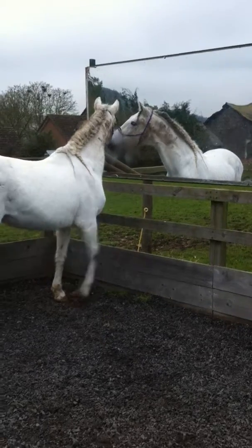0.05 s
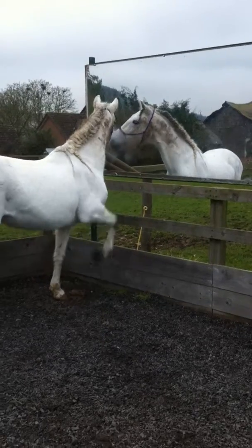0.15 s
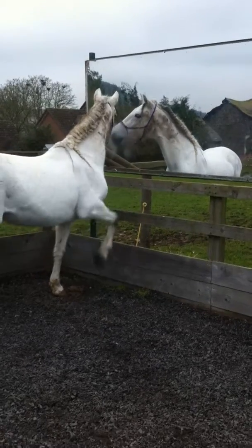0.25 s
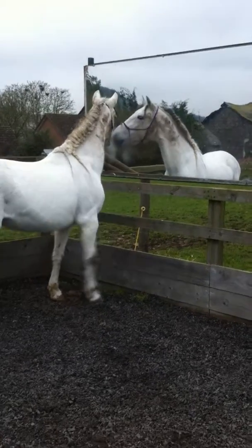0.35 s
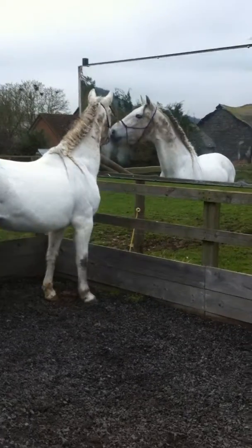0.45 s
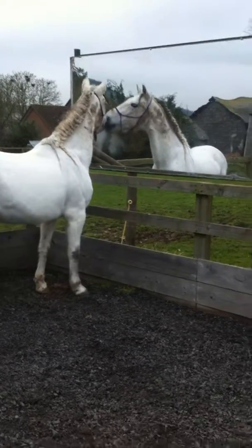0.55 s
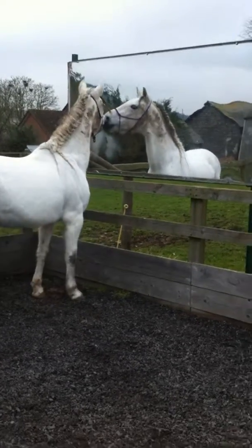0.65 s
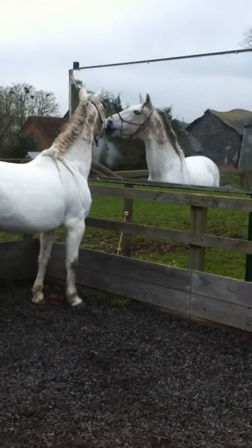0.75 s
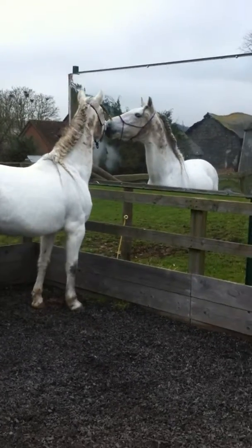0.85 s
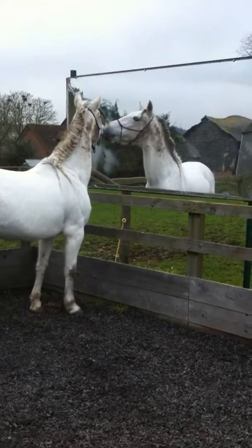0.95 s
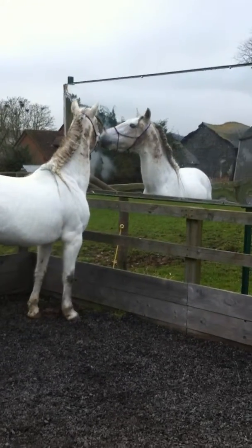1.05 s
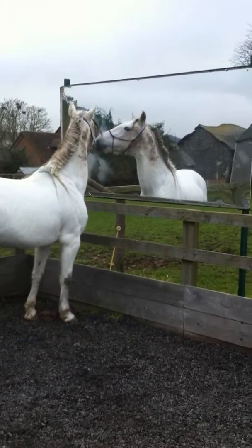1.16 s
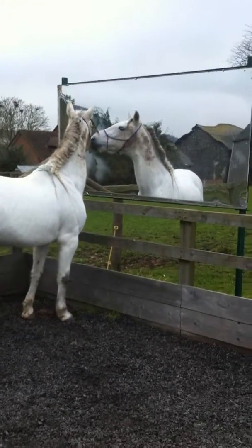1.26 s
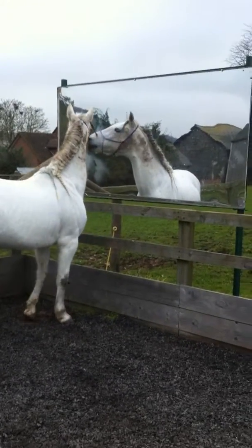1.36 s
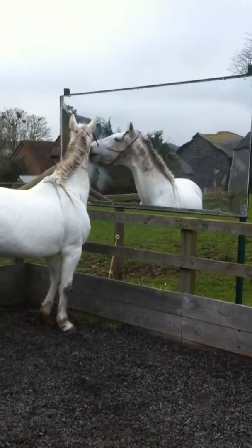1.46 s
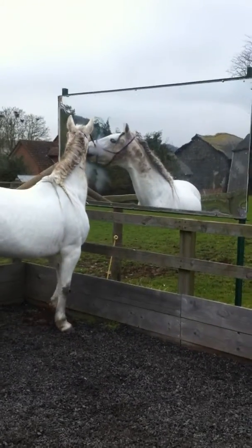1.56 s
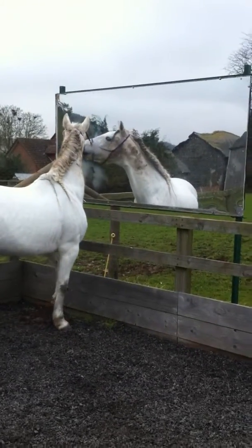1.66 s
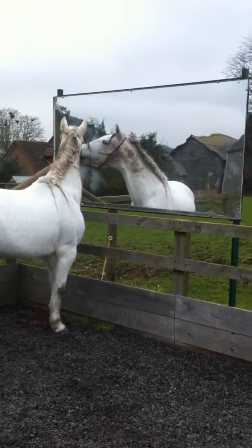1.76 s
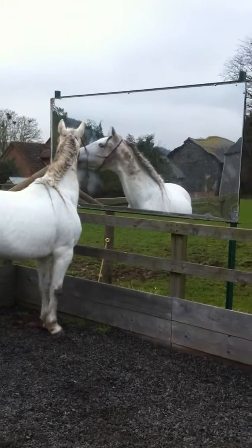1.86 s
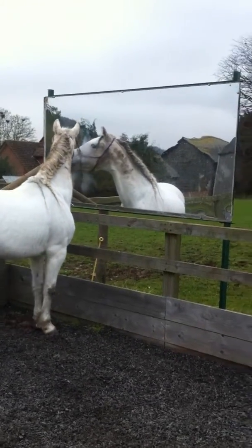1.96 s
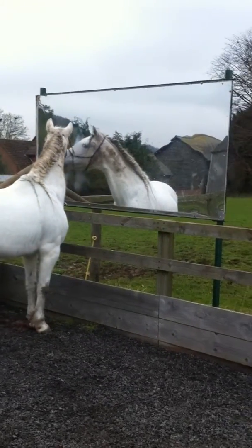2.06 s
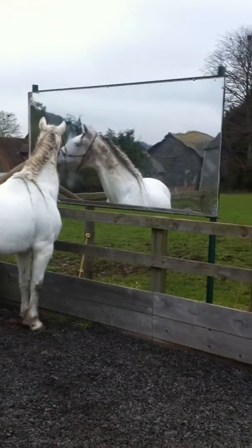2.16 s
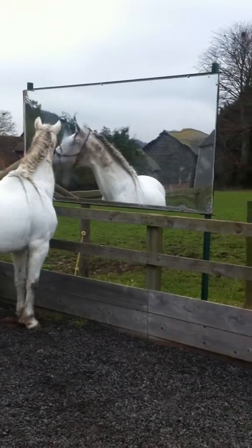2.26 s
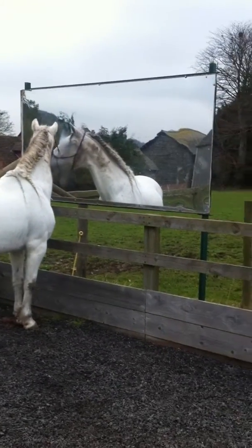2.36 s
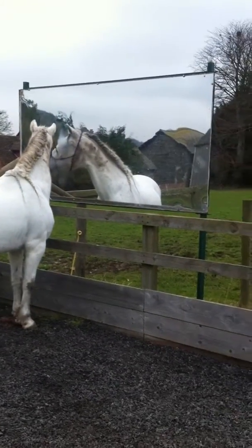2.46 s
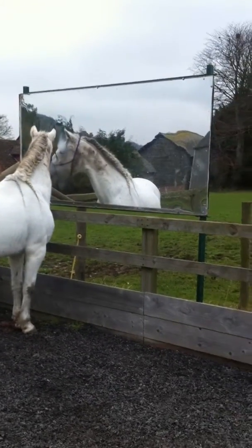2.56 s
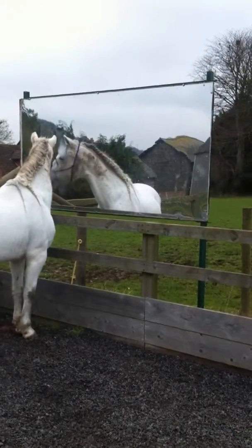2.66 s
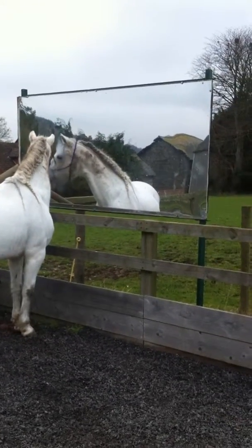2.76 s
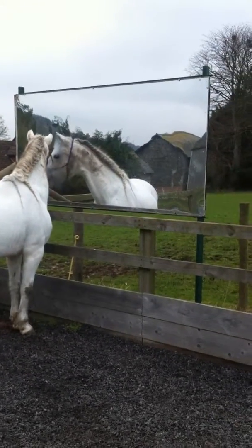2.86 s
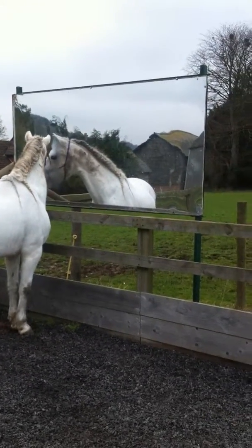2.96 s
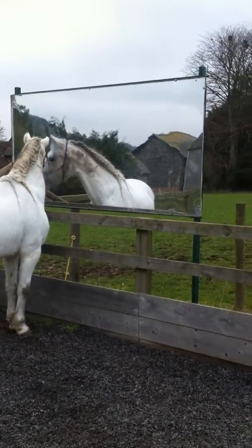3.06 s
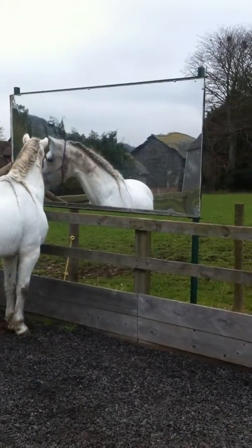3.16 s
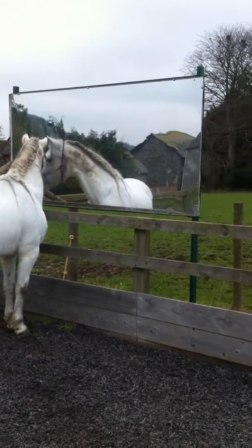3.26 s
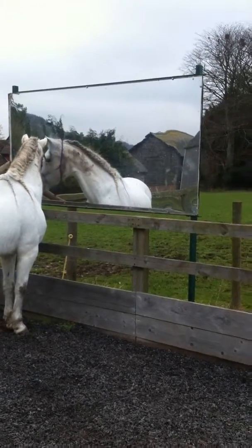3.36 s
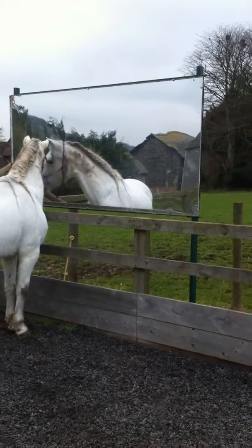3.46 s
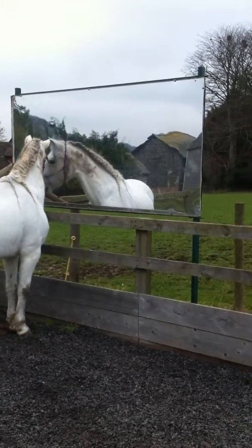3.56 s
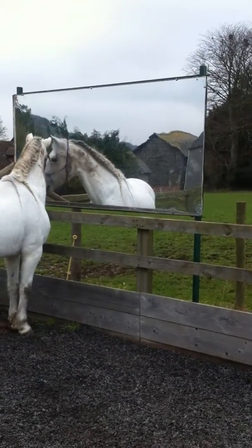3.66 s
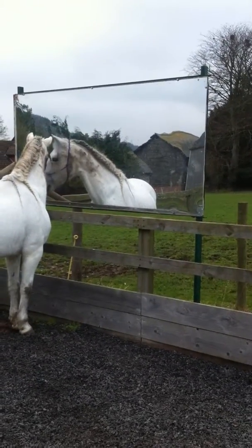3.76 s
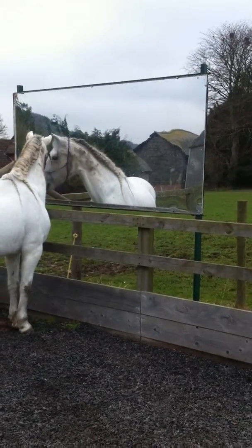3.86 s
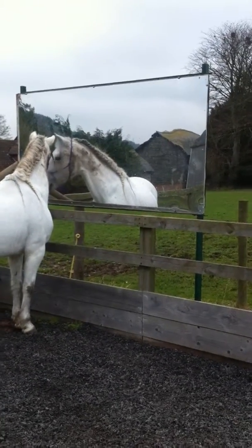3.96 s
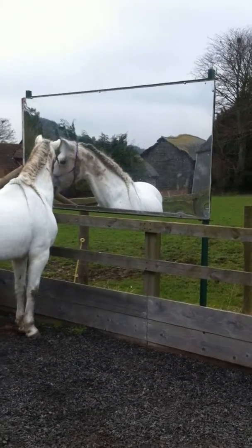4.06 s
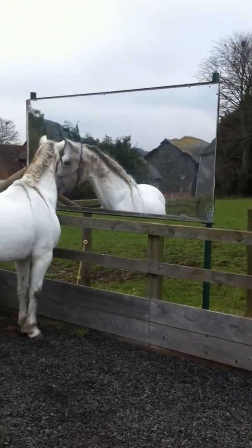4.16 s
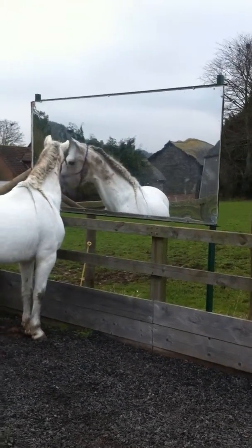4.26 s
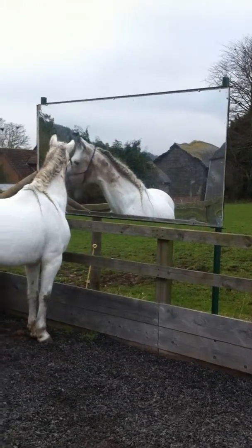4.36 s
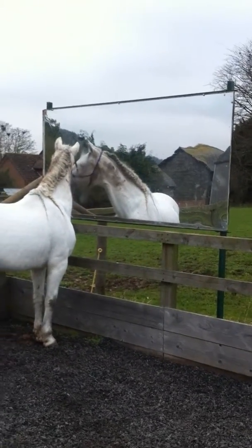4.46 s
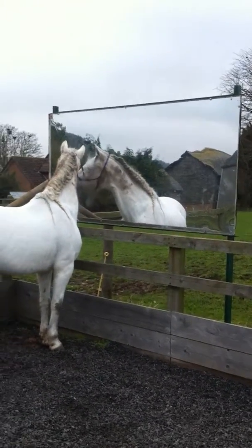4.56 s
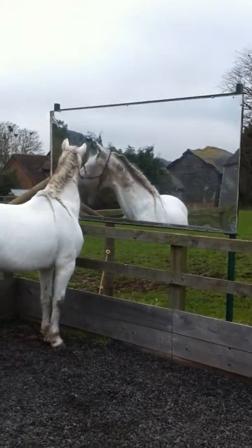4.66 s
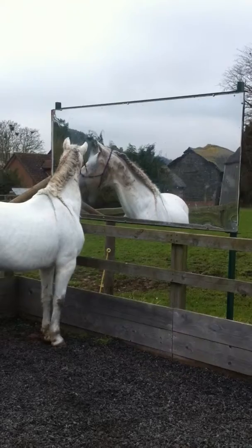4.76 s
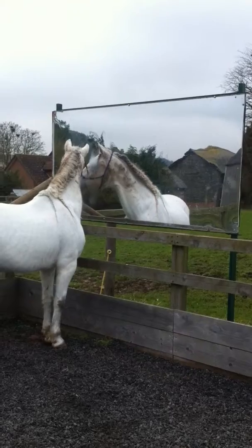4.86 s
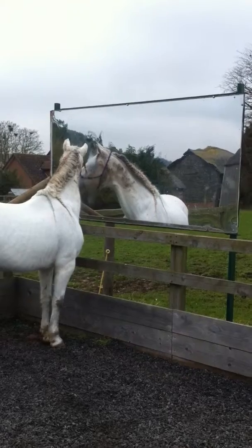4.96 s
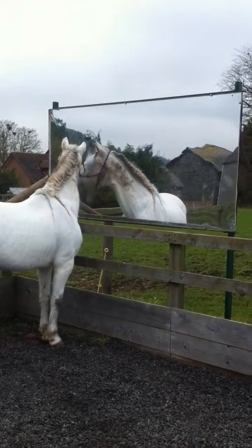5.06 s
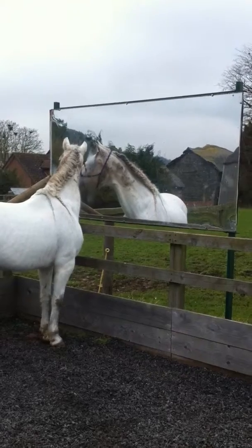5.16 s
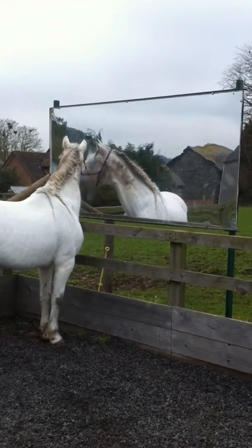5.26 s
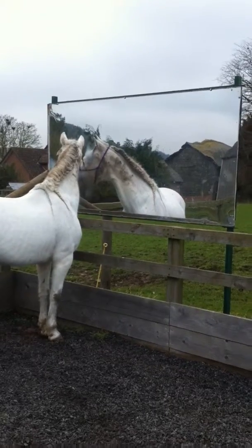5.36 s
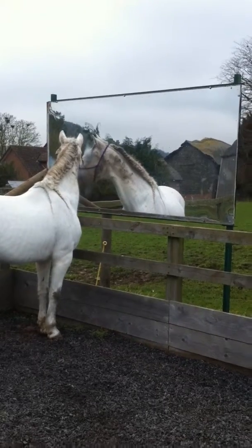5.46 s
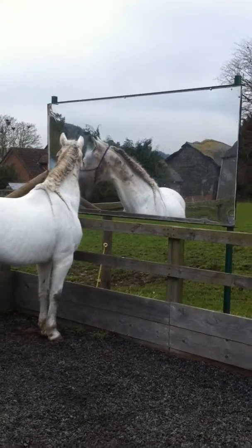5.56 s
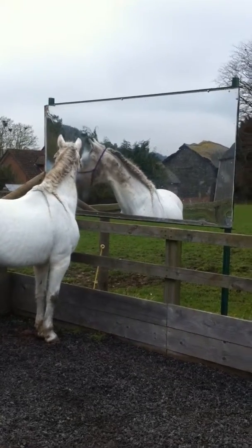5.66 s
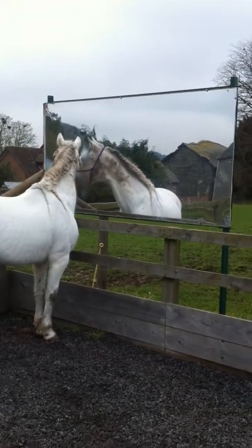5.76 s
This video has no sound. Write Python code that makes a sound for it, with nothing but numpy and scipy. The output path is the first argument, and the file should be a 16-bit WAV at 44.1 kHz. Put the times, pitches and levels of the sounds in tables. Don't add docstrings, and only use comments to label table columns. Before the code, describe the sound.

Faint road hum and soft hiss open with a distant bird wheeze. A horse's shrill squeal leaps up, holds, cracks into a raspy flutter around a hoof stamp, and drops into a short grunt, all within the first second. Light reflections return from sheds and a far barn. The remainder is quiet: tiny twig ticks, thin sliding bird chirps and buzzy wheezes, heard by a handheld microphone outdoors.

```python
import sys
import numpy as np
from scipy import signal
from scipy.fft import rfft, irfft, next_fast_len
from scipy.io import wavfile
from scipy.ndimage import uniform_filter1d, map_coordinates

SR = 44100
rng = np.random.default_rng(int(sys.argv[2]) if len(sys.argv) > 2 else 0)


def makeup_ratio(level_db):
    decades = np.asarray(level_db, float) / 20
    return 10 ** decades


def waveform_to_disk(signal):
    frames = np.transpose(np.atleast_2d(signal))
    scaled = np.clip(frames, -1, 1) * 32767
    samples = np.round(scaled).astype(np.int16)
    wavfile.write(sys.argv[1], SR, samples)


N = 256220
T = np.arange(N) / SR

# start_s, level_db
ROAD_SWELLS = [(1.25, -63), (2.15, -65), (3.09, -65.5), (3.71, -63), (4.11, -63.5), (4.54, -63),
               (4.65, -63.5), (5.01, -64), (5.45, -62.5), (5.81, -64)]
# freq_hz, density_db
ROAD_COLOUR = [(25, -16), (60, -19), (90, -12), (118, -2.5), (208, -1), (283, -8), (620, -2), (3200, -23.5)]
# freq_hz, density_db
HISS_COLOUR = [(1470, -29), (2500, -7.5), (3200, -6), (3730, -6), (14400, -10.5), (15700, -8)]
# start_s, pulse_rate_hz, beak_centre_hz, level_db
WHEEZES = [
    [(0, 445, 3220, -85.5), (.06, 444, 3170, -70), (.12, 445, 3000, -77)],
    [(1.565, 300, 5200, -88), (1.585, 310, 5500, -71), (1.6, 320, 5800, -80)],
    [(1.83, 448, 4300, -84), (1.92, 450, 4040, -77), (2.1, 438, 3700, -72), (2.2, 425, 3440, -72.5),
     (2.31, 409, 3050, -74), (2.38, 391.3, 3050, -78)],
    [(5.52, 443.7, 3990, -97), (5.62, 435, 3920, -76), (5.81, 428, 3800, -73)],
]
# start_s, length_s, from_hz, to_hz, level_db
CHIRPS = [(2.802, 0.022, 3200, 2530, -78), (2.856, 0.03, 3600, 2600, -69),
          (2.949, 0.037, 3650, 2790, -68.5), (3.057, 0.036, 3350, 2720, -67), (3.17, 0.03, 3550, 2800, -68),
          (3.27, 0.035, 3600, 2820, -68), (3.679, 0.019, 3900, 3040, -71.5), (3.763, 0.02, 3900, 2980, -70),
          (3.866, 0.03, 4000, 2990, -69.5), (4.523, 0.025, 4100, 3060, -69), (4.599, .022, 4000, 3120, -69),
          (4.694, 0.02, 3700, 2920, -73.5), (4.799, 0.016, 3900, 3100, -71.5),
          (1.474, 0.084, 4480, 4463, -71), (1.57, 0.083, 4400, 4600, -74.5),
          (1.693, 0.018, 6400, 5500, -72.5), (1.702, 0.076, 5550, 5100, -74),
          (2.325, 0.093, 2600, 1690, -73), (2.327, 0.036, 1720, 1450, -71), (5.44, 0.069, 5900, 5630, -78)]

# start_s, whistle_pitch_hz, effort_db, brightness_db, low_voice_pitch_hz
SQUEAL_PHRASES = [
    [(.113, 575, -75, -33, 189), (.126, 612.7, -53.5, -39, 192.3), (.172, 907, -43.5, -22, 187.5),
     (.204, 1084, -42, -8.5, 195.4), (.232, 1171, -39.5, -13.5, 229.9), (.276, 1199, -42, -1, 217.2),
     (.36, 1215, -43, -1, 204.3), (.4, 1214, -42, -0.5, 174.1), (.52, 1196, -40.5, -9, 179.2)],
    [(.56, 1150, -43.5, -18, 174.8), (.62, 1160, -45.5, -19.5, 228.6), (.7, 1131, -43.5, -32.5, 222),
     (.78, 1112, -47, -13.5, 198.9), (.826, 924.6, -45, -12, 201.4), (.87, 891, -48, -13.5, 201.7),
     (.89, 776.3, -49, -8.5, 189.7), (.92, 510.5, -52.5, -39, 180), (.96, 420.7, -81.5, -21, 173)],
]
# centre_hz, width_hz, level_db (per pass)
MOUTH_PEAKS = [(210, 140, -29), (513, 273, -3), (844, 540, -2.5), (1450, 213, 3.5), (1975, 330, 3),
               (3320, 1040, 0), (4400, 880, -11), (5340, 440, -17), (8200, 4600, -46)]
# centre_hz, width_hz
MOUTH_POUCHES = [(2650, 160), (5970, 280), (4230, 220), (974, 64)]
# freq_hz, level_db
LIP_COLOUR = [(600, 7), (900, 3), (1060, -5.5), (1250, 0), (2150, 6.5), (2650, -20.5), (3550, -0.5),
              (4800, 3)]
# freq_hz, level_db
OVERTONE_SHEEN = [(5000, 4.5), (6000, 1.5), (6450, -2), (7200, -4), (9600, -0.5), (11500, -10.5),
                  (13000, -9.5), (15700, -23)]
# start_s, sideband_1_db, sideband_2_db, sideband_3_db, rasp_db
COUPLING_STAGES = [(0.101, -24, -27, -26, -6), (.19, -18, 1, -15, -4), (.375, 1.5, -5, 3, -5.5),
                   (.47, -15, -6.5, -9.5, -2), (.58, -6.5, 2.5, -5, -1), (0.809, -6, -8, -24, 2.5)]
# start_s, swell_db
HEAVES = [(0.546, 1.5), (.572, -0.5), (0.592, 5.5), (0.622, 3.5), (.652, 8), (.668, 6.5), (0.696, 5),
          (.71, 8.5), (0.733, 7.5), (.758, 5), (0.78, 3.5), (0.801, 4), (0.825, 2.5)]
BRIGHT_SHARE = (.02, .05, .6, .9)
# crack_s, fall_s
REGISTER_TIMES = (.535, 0.83)
CLEAR_DB = (-1, -7.5, 1.5, -8.5)
CRACKED_DB = (-22, 1, 12, -0.5)
FALLING_DB = (-3, -2, 8.5, 14)
COUPLING_DB = (2, -1.05, -2, -6.5, -4)
NARROWED_DB = (-28, 5.5, -2.5, 4.5, -7.5)
# start_s, pitch_hz, level_db
GRUNT = [(.88, 514, -64), (.905, 430, -47), (.93, 277, -55), (.97, 250, -58.5), (1.0, 235.7, -78),
         (1.02, 222.5, -83)]

# freq_hz, t60_s
YARD_DECAY = [(200, 0.36), (2000, 0.61), (4000, 0.32), (10000, 0.64)]
# start_s, level_db, pitch_hz, t60_s
HOOF_KNOCKS = [
    (0.496, -33.5, 1052, 0.073),
    (0.506, -34, 1360, 0.11),
    (0.52, -35.5, 202.3, 0.14),
    (0.529, -38, 133, 0.1),
]
# start_s, peak_db
TWIG_TICKS = [(1.595, -60), (1.632, -58), (1.985, -59)]


def unit(x):
    return x / np.sqrt(np.mean(np.abs(x) ** 2) + 1e-20)


def along(points, hz):
    f, v = np.transpose(points)
    return np.interp(np.log(hz + 1), np.log(f + 1), v)


def curves(rows):
    s, *cols = np.transpose(rows)
    gate = (T >= s[0]) & (T <= s[-1])
    return [np.interp(T, s, c) for c in cols] + [gate]


def ramp(start_s, length_s):
    return np.clip((T - start_s) / length_s, 0, 1)


def ramp_down(end_s, length_s):
    return np.clip((end_s - T) / length_s, 0, 1)


def wobble(rate):
    coarse = T[::8]
    knots = rng.standard_normal(int(N * rate / SR) + 4)
    return np.interp(T, coarse, map_coordinates(knots, [coarse * rate]))


def turns(hz):
    return 2 * np.pi * np.cumsum(hz) / SR


def filtered(x, response):
    m = next_fast_len(N + SR // 2)
    return irfft(rfft(x, m) * response(np.fft.rfftfreq(m, 1 / SR)), m)[:N]


def background():
    z = signal.stft(rng.standard_normal(N + 512), nperseg=512)[2]
    patches = uniform_filter1d(rng.standard_normal(z.shape), 4, 0)
    patches = uniform_filter1d(patches, 12, 1)
    air = signal.istft(z * makeup_ratio(2 * unit(patches)), nperseg=512)[1][:N]
    hum = unit(filtered(air, lambda f: makeup_ratio(along(ROAD_COLOUR, f)) / (1 + (f / 3000) ** 4)))
    hiss = unit(filtered(rng.standard_normal(N), lambda f: makeup_ratio(along(HISS_COLOUR, f))))
    hum_db = curves(ROAD_SWELLS)[0] + 0.5 + 0.21 * wobble(6.6)
    hiss_db = -70 + 0.54 * wobble(18)
    return makeup_ratio(hum_db) * hum + makeup_ratio(hiss_db) * hiss


def birds():
    rate_hz, beak_hz, wheeze_db, _ = curves(np.vstack(WHEEZES))
    singing = sum((T >= rows[0][0]) & (T <= rows[-1][0]) for rows in WHEEZES)
    phase = turns(rate_hz * (1 + 0.0043 * wobble(40)))
    buzz = 0
    for k in range(5, 20):
        beak = np.exp(-((k * rate_hz - beak_hz) / 700) ** 2)
        buzz = buzz + beak * makeup_ratio(2.3 * wobble(90)) * np.sin(k * phase + 1.44 * wobble(250))

    chirps = np.zeros(N)
    flutter_db, quiver = 2.1 * wobble(90), 0.5 * wobble(180)
    for s, length, from_hz, to_hz, db in CHIRPS:
        u = ramp(s, length)
        swell = np.sin(np.pi * u ** 0.5) ** 0.52
        slide = turns(from_hz + (to_hz - from_hz) * u)
        chirps += makeup_ratio(db + 3 + flutter_db) * swell * np.sin(slide + quiver)
    return chirps + singing * makeup_ratio(wheeze_db) * buzz


def mouth(f):
    peaks = sum(makeup_ratio(db) * 1j * f * w / (c * c - f * f + 1j * f * w) for c, w, db in MOUTH_PEAKS) ** 2
    notches = np.prod([(c * c - f * f) / (c * c - f * f + 1j * f * w) for c, w in MOUTH_POUCHES], axis=0)
    return peaks * notches * (1j * f / (250 + 1j * f)) ** 2


def grunt():
    hz, db, gate = curves(GRUNT)
    tone = np.sin(turns(hz * (1 + 0.0508 * wobble(80.77))))
    return gate * makeup_ratio(db - 0.5 + 2.77 * wobble(57.4)) * tone


def squeal():
    hz, effort_db, bright_db, low_hz, gate = curves(np.vstack(SQUEAL_PHRASES))
    stages = np.array(COUPLING_STAGES)
    index = np.clip(np.searchsorted(stages[:, 0], T) - 1, 0, None)
    blended = uniform_filter1d(stages[index, 1:].T, round(0.035 * SR), axis=1)
    *side_db, coarse_db = effort_db + blended
    rasp_db = coarse_db + 0.61 * bright_db
    overtone_db = effort_db - 4 + bright_db

    crack_s, fall_s = REGISTER_TIMES
    falling = ramp(fall_s, 0.034)
    cracked = ramp(crack_s, 0.032) - falling
    hoarse = ramp(0.47, 0.058)
    heaving = hoarse * ramp_down(0.86, 0.17)
    closing = hoarse * ramp_down(0.8, 0.014)
    heaves_db = sum(db * np.exp(-((T - s) / 0.0068) ** 2) for s, db in HEAVES)
    throb_db = (0.4 + 0.43 * hoarse) * wobble(44.17) - 3 * heaving + heaves_db
    high = turns(hz * (1 + (0.0017 + 0.0023 * hoarse) * wobble(70.17)))

    lines = 0
    strengths = zip(BRIGHT_SHARE, CLEAR_DB, CRACKED_DB, FALLING_DB)
    for k, (share, clear, crack, fall) in enumerate(strengths, 1):
        register_db = clear + (crack - clear) * cracked + (fall - clear) * falling
        line_db = effort_db + along(LIP_COLOUR, k * hz) + share * bright_db + register_db
        line_db = line_db + 5 + throb_db + (1.2 + 0.61 * closing) * wobble(59.7)
        jitter = (1.4 * closing + 1.4 * falling * (k == 1)) * wobble(110)
        lines = lines + makeup_ratio(line_db) * np.sin(k * high + jitter)

    comb = 0
    for k, (db, change_db) in enumerate(zip(COUPLING_DB, NARROWED_DB)):
        comb = comb + makeup_ratio(db + change_db * closing) * np.exp(1j * ((k + 1) * high + k * k * np.pi / 5))
    sides = 0
    for m, db in enumerate(side_db, 1):
        unsteady_hz = low_hz * (1 + (0.01247 + 0.031 * closing) * wobble(25.15))
        low = m * turns(unsteady_hz) + (0.38 + 0.5 * closing) * wobble(59.94)
        sides = sides + makeup_ratio(db - 7.5 + throb_db + 4.1 * wobble(39.15)) * np.real(comb * np.exp(-1j * low))

    beat = np.exp(-1j * turns(2 * low_hz))
    chaos = (wobble(700) + 1j * wobble(700)) * beat
    rasp = makeup_ratio(rasp_db - 2.5 + throb_db) * np.real(comb * chaos)
    breath = makeup_ratio(rasp_db + 5 + 7 * closing + throb_db) * rng.standard_normal(N)

    hum_db = effort_db - 8.5 + throb_db + 5.1 * wobble(30.3) - 11 * ramp(0.72, 0.026)
    hum_share = 0.64 * ramp(0.3, 0.078) + 0.38 * cracked
    hum_hz = (1.9 + 0.18 * hoarse) * low_hz * (1 + 0.0411 * wobble(18))
    hum = makeup_ratio(hum_db) * hum_share * np.sin(turns(hum_hz) + 0.9 * wobble(90))

    overtones = 0
    for k in range(5, 17):
        level = makeup_ratio(2.6 * wobble(29) - 5)
        steady = makeup_ratio(3.5 * wobble(25) - 3) * np.exp(0.85j * wobble(150))
        beating = 0.5 * makeup_ratio(4 * wobble(12.7)) * np.exp(0.8j * wobble(120))
        noisy = (0.5 - 0.25 * falling) * wobble(900)
        shake = steady + beat * (beating + noisy)
        overtones = overtones + level * shake * np.exp(1j * k * high) * (k * hz < 15700)
    sheen = filtered(np.real(overtones), lambda f: makeup_ratio(along(OVERTONE_SHEEN, f)))

    whistle = gate * (lines + makeup_ratio(overtone_db) * sheen)
    voiced = filtered(gate * (sides + rasp + breath + hum), mouth)
    return whistle + voiced + grunt()


def yard(x):
    hz, t, z = signal.stft(rng.standard_normal(SR), SR, nperseg=256)
    decay = makeup_ratio(-60 * t / along(YARD_DECAY, hz)[:, None])
    tail = signal.istft(z * decay, SR, nperseg=256)[1]
    wet = signal.fftconvolve(np.pad(x, (600, 0)), tail / np.linalg.norm(tail))[:N]
    smear = rng.standard_normal(4000) * makeup_ratio(-55 * np.arange(4000) / 4000)
    late = np.pad(x, (round(0.295 * SR), 0))
    barn = signal.fftconvolve(late, smear / np.linalg.norm(smear))[:N]
    dull_barn = filtered(barn, lambda f: 1 / (1 + (f / 3200) ** 2))
    return makeup_ratio(-13.5) * wet + makeup_ratio(-21.5) * dull_barn


def stamp():
    out = np.zeros(N)
    for s, db, hz, t60 in HOOF_KNOCKS:
        t = np.clip(T - s, 0, None)
        rise = 1 - np.exp(-(t / 0.006) ** 2)
        knock = np.sin(2 * np.pi * hz * t + wobble(61.1))
        out += makeup_ratio(db - 60 * t / t60 + 3.6 * wobble(76.85)) * rise * knock
    grit = filtered(rng.standard_normal(N), lambda f: f * f / (f * f + 150 ** 2) / (1 + (f / 350) ** 4))
    return out + makeup_ratio(-38 - 60 * t / 0.09) * rise * unit(grit)


def twigs():
    size = np.zeros(N)
    for s, db in TWIG_TICKS:
        t = np.clip(T - s, 0, None)
        size += makeup_ratio(db - 60 * t / 0.02) * (t > 0)
    return size * filtered(rng.standard_normal(N), lambda f: f * f / (f * f + 4000 ** 2))


def scene():
    near = squeal() + stamp() + birds()
    return (near + yard(near) + twigs() + background())[None]


def low_pass(x):
    return signal.sosfilt(signal.butter(12, 15800, fs=SR, output="sos"), x)


def record(dry):
    mix = filtered(dry[0], lambda f: f ** 2 / (f ** 2 + 40 ** 2))[None]
    return low_pass(mix)


dry = scene()
out = record(dry)
waveform_to_disk(out)
```